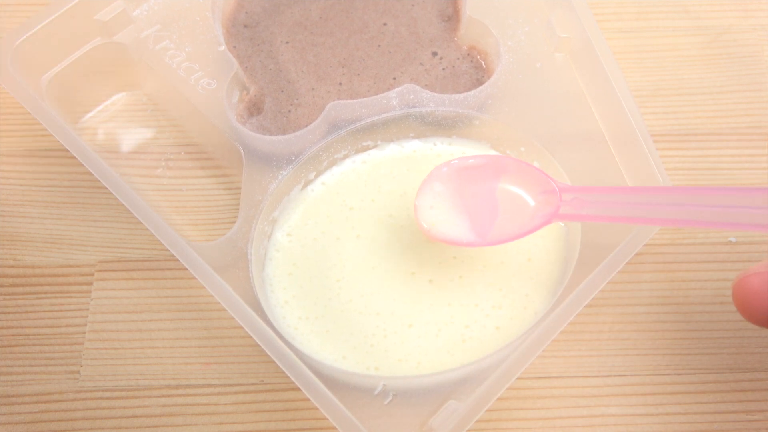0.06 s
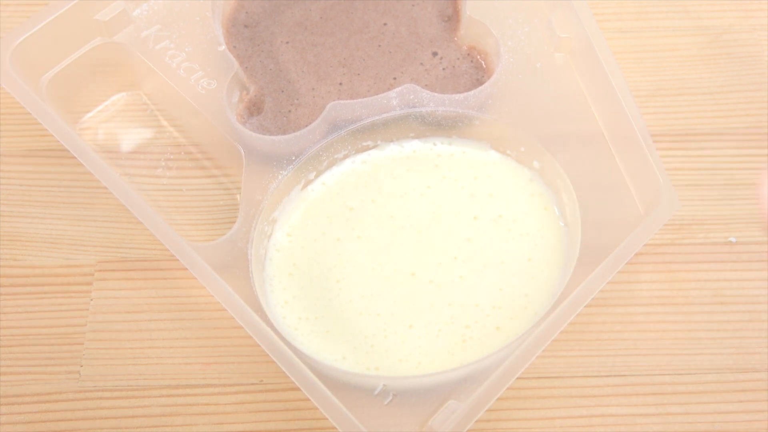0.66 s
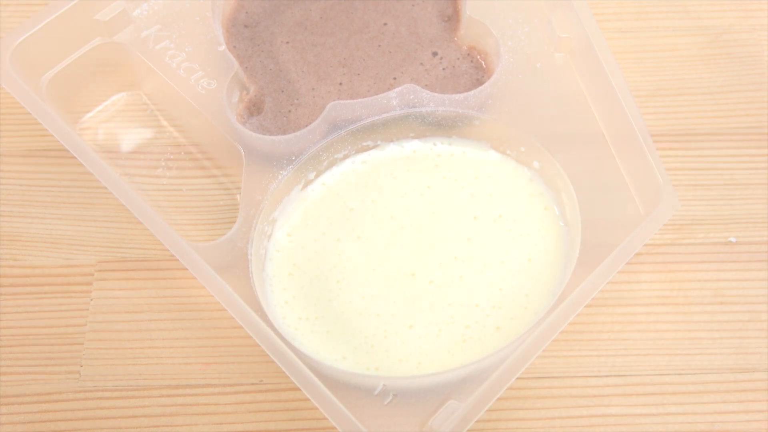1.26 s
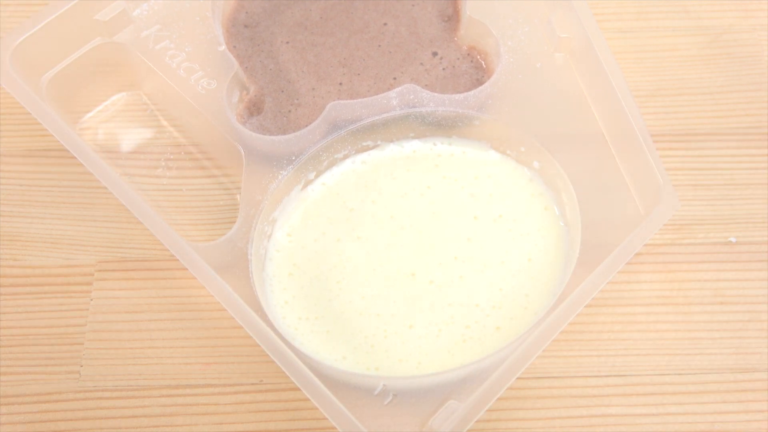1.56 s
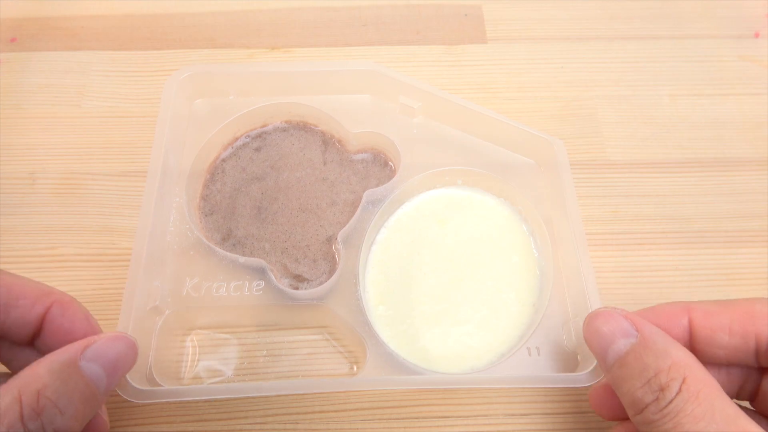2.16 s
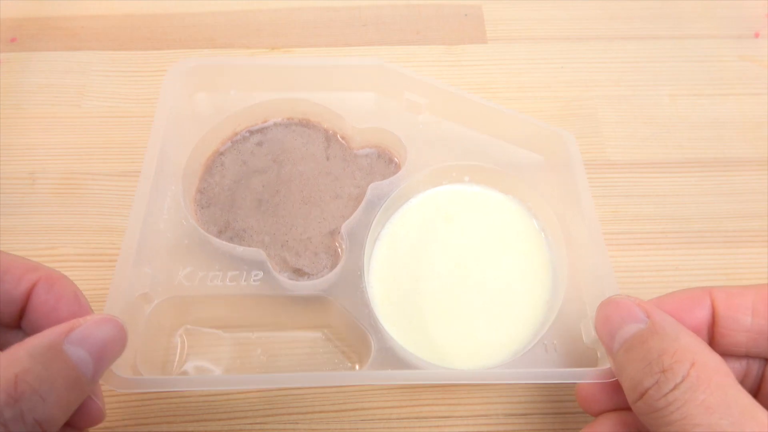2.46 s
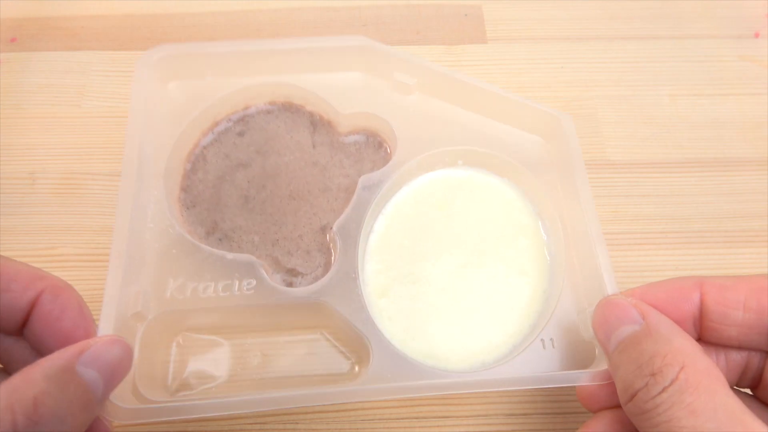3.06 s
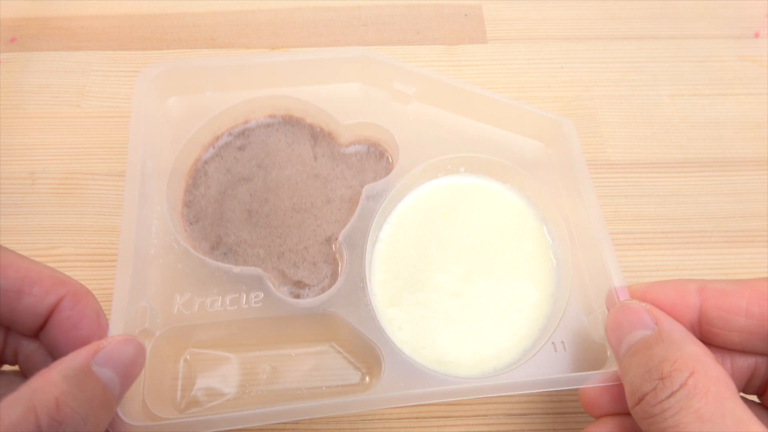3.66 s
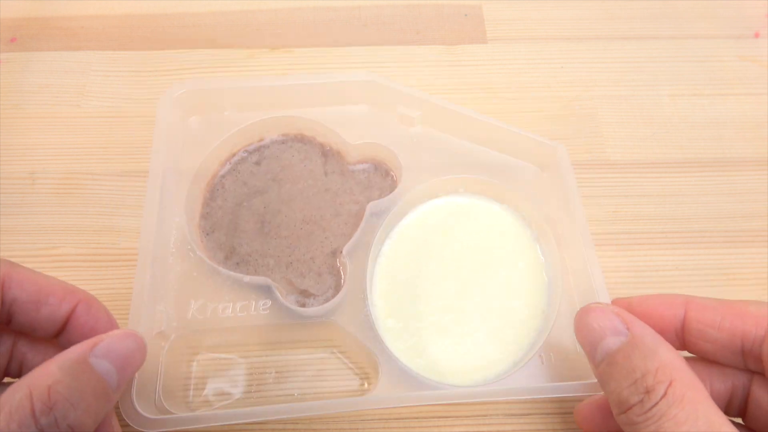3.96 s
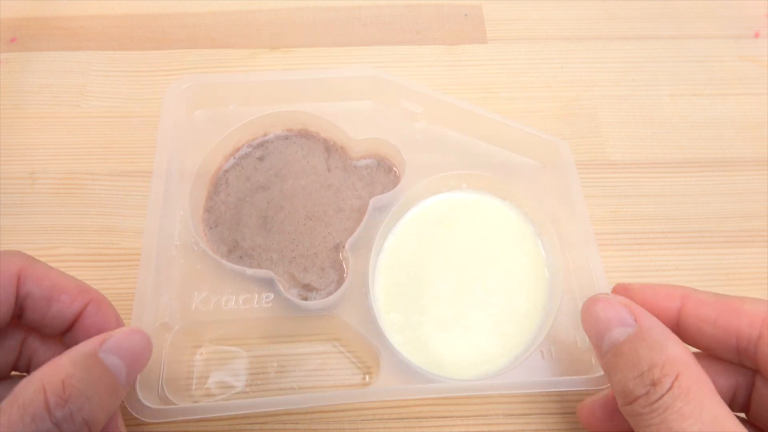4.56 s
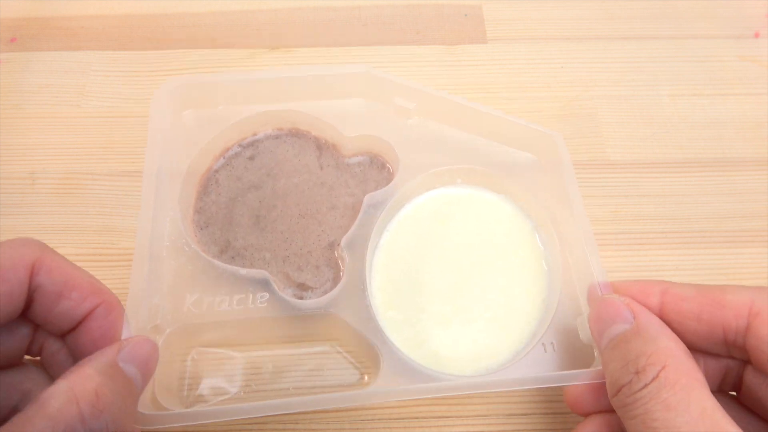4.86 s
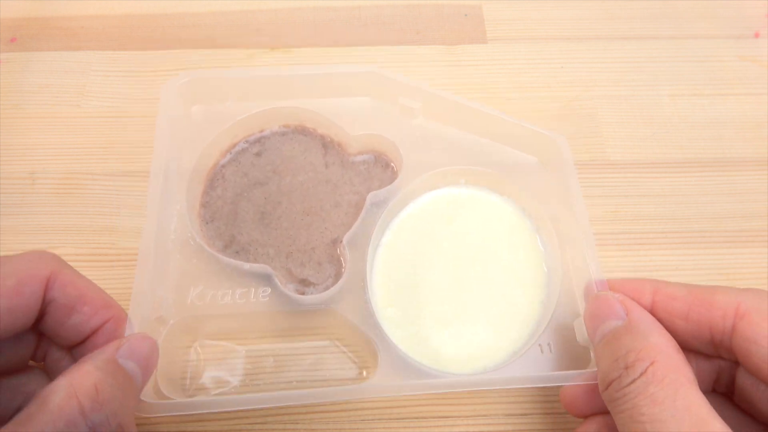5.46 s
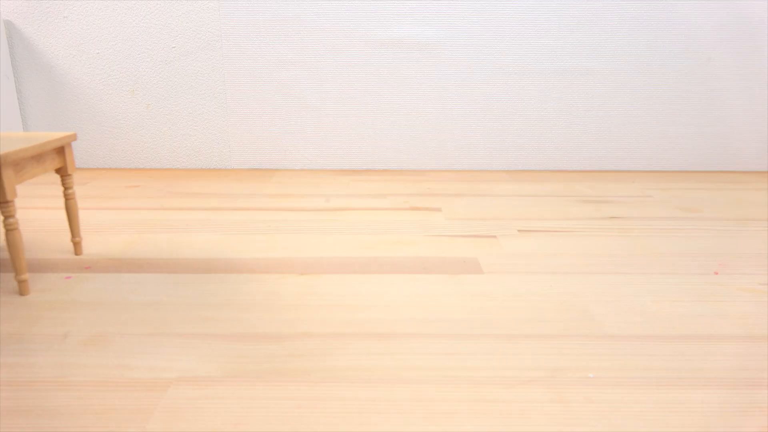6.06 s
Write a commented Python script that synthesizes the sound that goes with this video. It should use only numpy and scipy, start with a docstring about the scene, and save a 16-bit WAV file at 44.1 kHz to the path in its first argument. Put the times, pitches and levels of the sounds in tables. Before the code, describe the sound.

A plastic spoon scrapes faintly and dabs in a cup of cream. After a pause, a thin plastic tray ticks and rustles as it is gripped, then is knocked five times on a wooden table, each a sharp clack over a low thump. Finally a small piece of furniture slides across a wooden floor with a hiss and bumps once. The sounds are close, in a small, quiet room.

```python
"""A thin plastic tray is knocked five times on a wooden table: each knock is a clatter of impacts that
excite the resonances of its walls, over a thump from the modes of the table top. The tray ticks and
rustles as it is gripped and lifted. Before the knocks, a plastic spoon scrapes and dabs in a cup of
cream; after them, a small piece of furniture slides over the wooden floor with a hiss of friction and
bumps once. A small room reverberates faintly, over low rumble and hiss."""
import sys
import numpy as np
from scipy import signal
from scipy.fft import rfft, irfft, next_fast_len
from scipy.io import wavfile
from scipy.ndimage import map_coordinates

SR = 44100
rng = np.random.default_rng(int(sys.argv[2]) if len(sys.argv) > 2 else 0)


def dump_mix(stems):
    """Bounce the given channels to the path in sys.argv[1] as a 16-bit WAV at rate SR."""
    frames = np.atleast_2d(stems).T  # one column per channel
    limited = np.clip(frames, -1, 1)  # hard clip at full scale
    pcm = np.round(limited * 32767).astype(np.int16)
    wavfile.write(sys.argv[1], SR, pcm)


N = 279153

# Tray corners meeting the table: t/s, level/dB, treble/dB, wall f/Hz, left minus right/dB
CONTACTS = [(2.714, -20, 3, 4370, 0.5), (2.733, -30.5, -5, 1020, -4), (2.750, -23.5, 0, 1416, 2),
            (3.3732, -19, 9.5, 2600, 0.5), (3.3768, -22, 1, 1200, -1), (3.399, -19, -3.5, 1895, 2.5),
            (3.417, -37, -4.5, 1140, 0.5), (3.9586, -15, 5, 1260, -1), (3.972, -25.5, -2.5, 1100, 0),
            (3.984, -19, -12, 1870, 1), (4.5672, -17, 7, 2000, -4.5), (4.5764, -24, 2, 2480, -7.5),
            (4.6041, -24.5, -8, 1420, 4), (5.209, -16, 4.5, 1290, 1), (5.2161, -15.5, -3.5, 1720, -4),
            (5.253, -30, -2.5, 1410, 1.5), (5.258, -30, -4.5, 1420, 1)]
# Spectral envelope of a clack: f/Hz, level/dB
CLACK_SPECTRUM = [(100, -21.5), (180, -1), (260, -9.5), (400, -8.5), (650, -9), (880, -11.5), (1400, -8),
                  (2100, -13), (3000, -17), (4200, -17), (5500, -24.5), (9000, -32), (12000, -36),
                  (16000, -45)]
# Tray resonances: f/Hz, width/Hz, level/dB above the envelope
TRAY_MODES = [(335, 70.6, 7), (493, 120, 4), (1140, 240, 2), (1640, 300, 3), (2424, 150, 4.5),
              (2700, 34, 6.5), (3464, 190, 4), (4070, 130, 0), (6000, 260, 1), (8600, 780, 2.5)]
# Modes of the table top: f/Hz, level/dB, T60/s
TABLE_MODES = [(49.1, 0.5, 0.24), (92, -16.5, 0.47), (146.4, -11.5, 0.33), (226.2, -30, 0.37),
               (340, -13.5, 0.064)]
def tray_knocks():
    """Impact excitation: each corner clacks, displaces air and sets the table top in free vibration."""
    clacks, thumps = np.zeros((2, N)), np.zeros((2, N))
    t = np.arange(SR // 2) / SR
    puff_hz, puff_t60, settle_s = 100, 0.045, 0.017
    landings = landing_times()
    for s, db, treble_db, wall_hz, pan_db in CONTACTS:
        # each corner rings its own stretch of wall; the first contact of each knock is brightest
        plastic = response(CLACK_SPECTRUM, TRAY_MODES + [(wall_hz, wall_hz / 3, 5.5)])
        edge = lambda hz: plastic(hz) * amp(treble_db * hz ** 2 / (hz ** 2 + 4300 ** 2))
        clack = impact(edge, t60=0.016, ring_db=-16, ring_t60=0.094, side_db=-1.5)
        clack += amp(-7.5) * chatter(tilted(response(CLACK_SPECTRUM), slope_db=-3), t60=0.079, grain_db=6)
        add(clacks, s, amp(db - 11.5) * clack * amp([[pan_db / 2], [-pan_db / 2]]))
        # the landing takes the weight, so later contacts thump less; each new knock is firmer
        landed = landings[landings <= s]
        settled = 1 - np.exp((landed.max() - s) / settle_s)
        thump_db = -20.5 + 0.68 * db - 5 * settled + 1.1 * len(landed)
        phase = rng.normal(0, 0.43) * np.array([[1], [-1]])  # left and right slightly out of step
        puff = np.cos(2 * np.pi * puff_hz * t + phase) * decay(t, puff_t60) * onset(t, 0.0011)
        # modal amplitudes vary with the point of contact
        modes = -sum(amp(level + rng.normal(0, 1.9)) * decay(t, t60) * np.sin(2 * np.pi * hz * t)
                     for hz, level, t60 in TABLE_MODES)
        add(thumps, s, amp(thump_db + 13) * puff + amp(thump_db + 2.5) * modes)
    # the thump is cut away below about 37 Hz
    highpass = signal.butter(3, 37, "high", fs=SR, output="sos")
    return clacks, signal.sosfilt(highpass, thumps) * amp([[-0.7], [0.7]])


def chatter(gain, t60, grain_db):
    """Rebound: tiny uneven bounces follow a contact as a grainy decay of noise."""
    t = np.arange(SR // 5) / SR
    knots = np.arange(0, 0.2, 0.0015)
    grain = amp(grain_db * np.interp(t, knots, rng.standard_normal(len(knots))))
    bounces = rng.standard_normal((2, len(t))) * grain * decay(t, t60) * onset(t, 0.003)
    return unit_energy(coloured(bounces, gain))


def landing_times(gap_s=0.2):
    """Temporal grouping: a contact after a pause longer than gap_s begins a new knock."""
    times = np.array(CONTACTS)[:, 0]
    return times[np.diff(times, prepend=0) > gap_s]


# The tray wall snapping under the fingers: t/s, level/dB, ringing f/Hz
SNAPS = [(2.025, -40, 3450), (2.099, -48, 2050), (2.105, -49, 1980), (2.201, -54.5, 2190),
         (2.273, -48, 4960), (2.478, -54, 2460), (2.929, -38.5, 1770), (2.963, -45.5, 4740),
         (2.982, -46.5, 1900), (3.517, -44.5, 1840), (4.219, -38, 2960), (4.823, -41, 3040),
         (4.834, -48.5, 2560), (5.473, -43, 1630)]
# The tray shifting in the hands: peak t/s, level/dB, 20 dB rise/s, 20 dB fall/s
GRIP_RUBS = [(1.975, -69.5, 0.13, 0.034), (2.279, -65, 0.061, 0.16), (2.451, -74.5, 0.033, 0.038),
             (2.895, -66, 0.087, 0.029), (2.979, -60.5, 0.039, 0.082), (3.59, -60.5, 0.13, 0.07),
             (4.246, -55, 0.055, 0.068), (4.525, -68, 0.032, .08), (4.831, -65.5, 0.0402, 0.084),
             (4.92, -63.5, 0.047, 0.037), (5.465, -69, 0.11, 0.071), (5.536, -62, 0.049, 0.042)]
# Spectral envelope of flexing plastic: f/Hz, level/dB
RUSTLE_SPECTRUM = [(150, -40), (250, -9), (586, -5), (710, -2), (788, -5.5), (1760, -1.5), (2860, -5.5),
                   (3650, -10.5), (4730, -8), (8850, -16.5), (16000, -26.5)]
def tray_handling():
    """Flexure of a thin shell: the tray ticks and rustles as it is gripped, lifted and swung down."""
    ticks = np.zeros((2, N))
    for s, db, ring_hz in SNAPS:
        wall = tilted(response(RUSTLE_SPECTRUM, TRAY_MODES + [(ring_hz, ring_hz / 5, 8)]), slope_db=0.2)
        add(ticks, s, amp(db - 14.5) * impact(wall, t60=0.003, ring_db=-17, ring_t60=0.068, side_db=-1))
    rubs = sum(amp(db) * swell(s, rise, fall) for s, db, rise, fall in GRIP_RUBS)
    swings = amp(-65) * sum(swell(s, rise=0.051, fall=0.02) for s in landing_times())
    grain = roughness(rate_hz=500, depth_db=3.2)
    rustle = grain * noise(RUSTLE_SPECTRUM, side_db=0.5, peaks=TRAY_MODES)
    return ticks + amp(3) * (rubs + swings) * rustle


# A light, high tick during the slide, then the legs catching in one bump:
# t/s, level/dB, boom level/dB, ringing f/Hz, tilt/(dB per octave)
SLIDE_IMPACTS = [(5.799, -30.5, -55, 4830, 4.5), (5.992, -24, -22.5, 262, -3),
                 (6.001, -16, -25, 2556, -0.5), (6.008, -18.5, -34, 687, 0), (6.015, -18, -38, 4160, 0),
                 (6.021, -20, -31, 2650, 2.5)]
# Resonances of the struck frame and of legs sliding on boards: f/Hz, width/Hz, level/dB above the envelope
FRAME_MODES = [(246, 48, 9.5), (495, 80, 9), (724, 28, 9), (828, 13, 1), (980, 25, 10), (1218, 95, 14.5),
               (1546, 41, 10), (2060, 77, 9.5), (2295, 54, 10), (2500, 45, 4), (2680, 37, 9.5),
               (2927, 15, 5), (3130, 59, 7), (3720, 35, -2), (3870, 26, 8.5), (4260, 130, 1.5),
               (5600, 28, 11.5), (6220, 100, 10)]
SLIDE_MODES = [(257, 82, 4.5), (454, 45, 6), (547, 50, 10), (861, 20, 6.5), (960, 22, 10.5),
               (1184, 34, 10.5), (1555, 83, 6.5), (1848, 71, 9.5), (2685, 98, 12.5), (3250, 40, 7),
               (3440, 48, 9.5), (3740, 40, 6), (5140, 92, 12), (6080, 92, 8), (7400, 54, 10),
               (7640, 100, 5), (8350, 80, 11)]
# Spectral envelopes of the slide, its treble fizz, the frame's drone and the bump: f/Hz, level/dB
GLIDE_SPECTRUM = [(140, -24), (230, -1), (370, -10.5), (600, -9), (1100, -10), (2200, -13.5), (3300, -13),
                  (4100, -16), (4550, -20.5), (5200, -20), (7800, -40), (13000, -82)]
FIZZ_SPECTRUM = [(3240, -41.5), (5500, -9.5), (6120, -3.5), (7720, -2), (11000, -16.5), (13300, -11.5),
                 (16000, -21)]
DRONE_SPECTRUM = [(24, -37), (40, -19), (60, -1), (90, -10), (143, -3), (180, -10.5), (260, -18),
                  (400, -39), (660, -81)]
BUMP_SPECTRUM = [(120, -15.5), (220, -14.5), (380, -9), (700, -6), (1700, -11.5), (2600, -5), (4100, -10),
                 (5000, -15.5), (8000, -24.5), (11000, -34), (16000, -50.5)]
def furniture():
    """Sliding friction: legs hiss over the floor, drive the frame to drone and catch with a rattle."""
    start_s, pickup_s, push_db_per_s = 5.668, 0.1, 8.5
    elapsed = np.maximum(np.arange(N) / SR - start_s, 0)
    # the slide gathers speed, then keeps growing as the push goes on
    drive = onset(elapsed, 0.001) * amp(-14 * np.exp(-elapsed / pickup_s) + push_db_per_s * elapsed)
    friction = drive * roughness(rate_hz=220, depth_db=1.54)
    out = amp(-47.5) * friction * noise(GLIDE_SPECTRUM, side_db=1, peaks=SLIDE_MODES) * amp([[2], [-2]])
    out += amp(-54) * friction * noise(FIZZ_SPECTRUM, side_db=-0.5, peaks=SLIDE_MODES) * amp([[-1], [1]])
    # the hardest impact shakes the frame into a louder drone
    hardest_s = max(SLIDE_IMPACTS, key=lambda row: row[1])[0]
    drone_gain = amp(-52) * drive + amp(-39.5) * swell(hardest_s, rise=0.019, fall=0.15)
    out += drone_gain * noise(DRONE_SPECTRUM, side_db=-8, peaks=[(142.5, 13, 11.6)])
    t = np.arange(SR // 5) / SR
    boom_hz, boom_t60, phase = 128, 0.13, np.array([[0.5], [-0.5]])
    boom = np.sin(2 * np.pi * boom_hz * t + phase) * decay(t, boom_t60) * onset(t, 0.00063)
    for s, db, boom_db, ring_hz, slope_db in SLIDE_IMPACTS:
        frame = response(BUMP_SPECTRUM, FRAME_MODES + [(ring_hz, ring_hz / 12, 10)])  # its own note
        rattle = impact(tilted(frame, slope_db), t60=0.023, ring_db=-10.5, ring_t60=0.15, side_db=-0.5)
        add(out, s, (amp(db - 8.5) * rattle + amp(boom_db - 1.5) * boom) * amp([[2.5], [-2.5]]))
    return out


# The spoon dragging in the cup: t/s, duration/s, scrape level/dB, wet hiss level/dB
SPOON_STROKES = [(0.0, 0.14, -68, -71), (0.431, 0.064, -54, -70), (.534, 0.01, -56, -59.5)]
# The spoon dabbing in the cream: t/s, level/dB
SPOON_DABS = [(.158, -54.5), (.428, -38), (.541, -30), (.552, -30.5), (0.563, -34), (0.631, -49.5)]
# Spectral envelopes of the scrape, the cream's wet hiss and a dab: f/Hz, level/dB
SCRAPE_SPECTRUM = [(150, -31), (250, -18), (430, 1.5), (600, -5), (760, -3), (900, -9), (1500, -3.5),
                   (2100, -10.5), (3000, -17), (4200, -14), (5200, -22), (7000, -37), (11000, -91)]
WET_SPECTRUM = [(2500, -51), (5000, 2), (6500, -1), (8500, -4.5), (10700, 0), (12500, -15), (16000, -21)]
DAB_SPECTRUM = [(71, -29), (120, -12), (393, 3), (569, -5.5), (656, -3.5), (1050, -14.5), (1400, 0.5),
                (1830, -24), (2480, -21), (2990, -35), (6240, -51), (10400, -32), (16000, -49.5)]
def spoon():
    """Friction and damped transients: the spoon scrapes wetly and comes free of the cream in soft dabs."""
    scrape_gain, wet_gain = sum(amp([[scrape_db], [wet_db]]) * swell(s, rise=0.073, fall=0.051, hold=hold)
                                for s, hold, scrape_db, wet_db in SPOON_STROKES)
    grain = roughness(rate_hz=600, depth_db=2.9)
    scrape = scrape_gain * noise(SCRAPE_SPECTRUM, side_db=1)
    wet_hiss = wet_gain * noise(WET_SPECTRUM, side_db=0)
    out = amp(-0.5) * grain * (scrape + wet_hiss)
    for s, db in SPOON_DABS:
        dab = impact(response(DAB_SPECTRUM), t60=0.013, ring_db=-4.5, ring_t60=0.075, side_db=2)
        add(out, s, amp(db - 8.5) * dab)
    return out * amp([[-4.5], [2.5]])


# Reverberation time of the small room: f/Hz, T60/s
ROOM_T60 = [(150, 0.3), (1000, 0.23), (4000, 0.27), (12000, 0.25)]
def room(x):
    """Reverberation: a short room echo in which each frequency decays at its own rate."""
    out, step = np.zeros((2, N)), SR // 2
    for start in range(0, N, step):  # the random tail is drawn afresh every half second
        hz, t, spectra = signal.stft(rng.standard_normal((2, SR // 2)), SR, nperseg=256)
        spectra = spectra * decay(t, log_interp(ROOM_T60, hz)[:, None]) * onset(t, 0.0036)
        tail = signal.istft(spectra, SR, nperseg=256)[1]
        tail /= np.linalg.norm(tail[0])
        add(out, start / SR, signal.fftconvolve(x[:, start:start + step], tail, axes=1))
    return out


# Spectral envelopes of microphone hiss and room rumble: f/Hz, level/dB
HISS_SPECTRUM = [(120, -22.5), (200, 1), (236, -3), (380, -11), (482, -2.5), (683, -8.5), (2330, -14.5),
                 (2910, -16), (11900, -20.5), (16000, -25)]
RUMBLE_SPECTRUM = [(12, -29.5), (20, 3), (46, 0.5), (87, -6), (113, -17.5), (145, -11), (184, -24),
                   (236, -26.5), (400, -26.5), (520, -57.5), (880, -120)]
def background():
    """Noise floor: rumble, hiss and a faint electronic whine, which step down at about 2 s."""
    drop_s, fade_s, whine_hz = 2.04, 0.14, 12000
    t = np.arange(N) / SR
    hiss_db = np.interp(t, [drop_s, drop_s + fade_s], [-68.5, -79])
    rumble_db = np.interp(t, [drop_s, drop_s + fade_s], [-60, -66.5])
    hiss = amp(hiss_db) * noise(HISS_SPECTRUM, side_db=0, peaks=[(whine_hz, 90, 8.3)])
    return hiss + amp(rumble_db) * noise(RUMBLE_SPECTRUM, side_db=-10)


def impact(gain, t60, ring_db, ring_t60, side_db):
    """Impulse response of one contact: a crack, then dense modes dying away."""
    t = np.arange(SR // 5) / SR
    envelope = decay(t, t60) + amp(ring_db) * decay(t, ring_t60)
    return unit_energy(coloured(white_pair(len(t), side_db) * envelope, gain))


def noise(spectrum, side_db, peaks=()):
    """Stationary coloured stereo noise of rms 1."""
    return unit_rms(coloured(white_pair(N, side_db), response(spectrum, peaks)))


def white_pair(count, side_db):
    """Stereo white noise whose side-to-mid ratio sets its coherence."""
    mid, side = rng.standard_normal((2, count))
    return unit_rms(np.array([mid + amp(side_db) * side, mid - amp(side_db) * side]))


def roughness(rate_hz, depth_db):
    """Random amplitude modulation: a smooth gain of rms 1 through rate_hz knots a second."""
    knots = rng.standard_normal(int(N * rate_hz / SR) + 4)
    return unit_rms(amp(depth_db * map_coordinates(knots, [np.arange(N) * rate_hz / SR])))


def response(spectrum, peaks=()):
    """Magnitude response: resonance peaks standing on a broad spectral envelope."""
    return lambda hz: amp(log_interp(spectrum, hz)
                          + sum(db / (1 + (2 * (hz - f) / width) ** 2) for f, width, db in peaks))


def tilted(gain, slope_db):
    """Spectral tilt of slope_db an octave above 400 Hz, pivoting at 2500 Hz."""
    return lambda hz: gain(hz) * amp(slope_db * np.log2(np.maximum(hz, 400) / 2500))


def coloured(x, gain):
    """Minimum-phase filter of magnitude gain(hz), made causal by folding the cepstrum."""
    n = x.shape[-1]
    size = 2 * next_fast_len(n // 2 + 2048)
    magnitude = np.maximum(gain(np.fft.rfftfreq(size, 1 / SR)), 1e-6)
    cepstrum = irfft(np.log(magnitude), size)
    cepstrum[1:size // 2] *= 2
    cepstrum[size // 2 + 1:] = 0
    return irfft(rfft(x, size) * np.exp(rfft(cepstrum)), size)[..., :n]


def swell(s, rise, fall, hold=0):
    """Exponential envelope: up 20 dB per rise seconds until s, held, then down 20 dB per fall seconds."""
    t = np.arange(N) / SR - s
    return amp(-20 * (np.maximum(-t, 0) / rise + np.maximum(t - hold, 0) / fall))


def decay(t, t60):
    """Exponential damping by 60 dB in t60 seconds."""
    return amp(-60 * t / t60)


def onset(t, tau):
    """First-order rise with time constant tau."""
    return 1 - np.exp(-t / tau)


def log_interp(points, hz):
    """Interpolation of (f/Hz, value) points on a logarithmic frequency axis."""
    f, values = np.transpose(points)
    return np.interp(np.log(hz + 1), np.log(f + 1), values)


def amp(db):
    """Decibels to amplitude ratio."""
    return 10 ** (np.asarray(db) / 20)


def unit_rms(x):
    """Normalisation to rms 1."""
    return x / np.sqrt(np.mean(x ** 2) + 1e-20)


def unit_energy(x):
    """Normalisation to the energy of 10 ms of stereo sound at rms 1."""
    return x / np.sqrt(np.sum(x ** 2) / (2 * SR / 100))


def add(track, s, x):
    """Superposition of x on the track from time s."""
    part = track[:, round(s * SR):][:, :x.shape[-1]]
    part += x[..., :part.shape[1]]


def scene():
    """Superposition of close sources in one small room; the tray and the spoon excite its reverberation."""
    clacks, thumps = tray_knocks()
    near = clacks + tray_handling() + spoon()
    return near + thumps + amp(-16) * room(near) + furniture() + background()


def record(dry):
    """Band limiting: an ideal low-pass filter removes everything above the cutoff."""
    cutoff_hz = 16100
    size = next_fast_len(N + SR // 2)
    passband = np.fft.rfftfreq(size, 1 / SR) < cutoff_hz
    return irfft(rfft(dry, size) * passband, size)[:, :N]


dry = scene()
out = record(dry)
dump_mix(out)
```